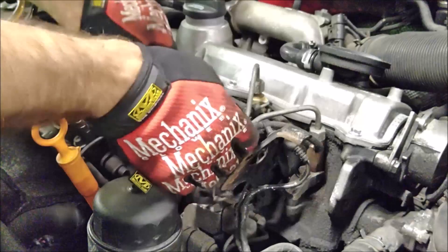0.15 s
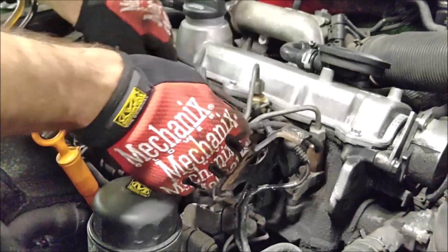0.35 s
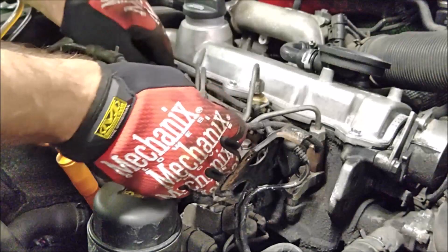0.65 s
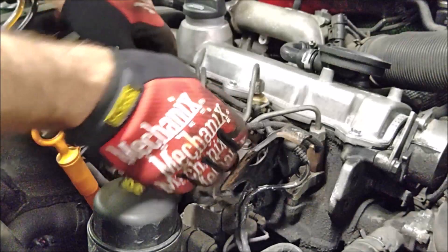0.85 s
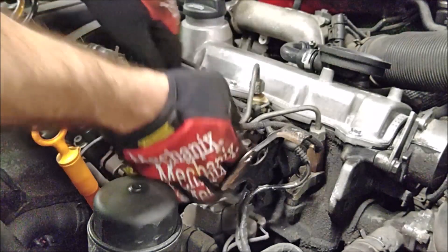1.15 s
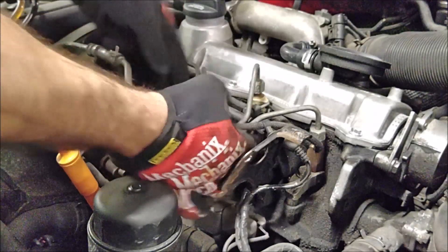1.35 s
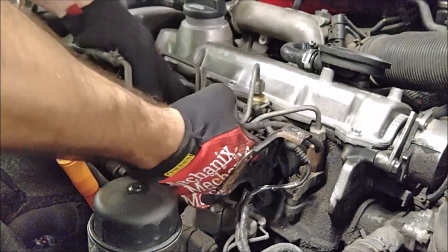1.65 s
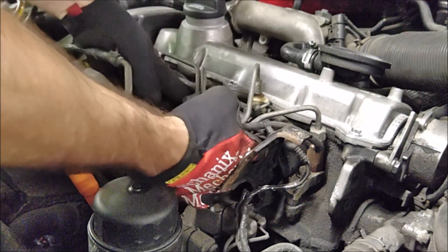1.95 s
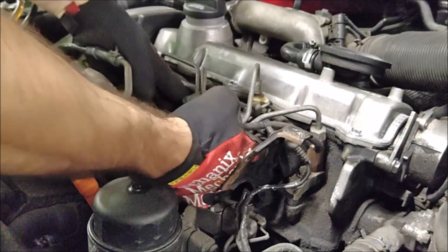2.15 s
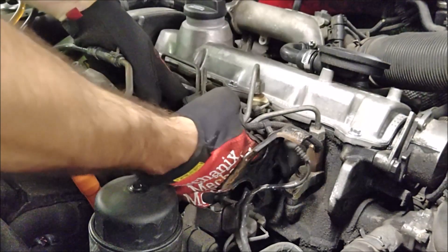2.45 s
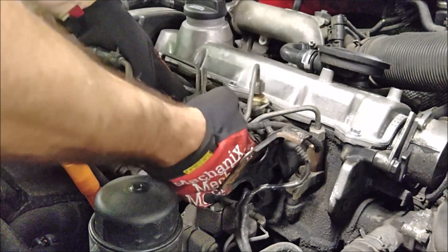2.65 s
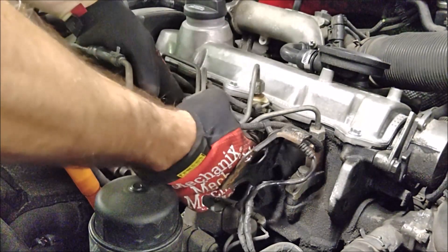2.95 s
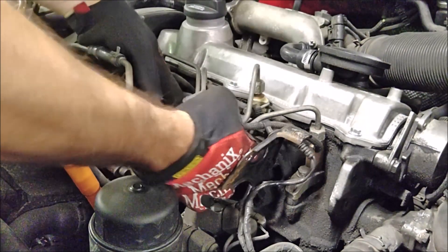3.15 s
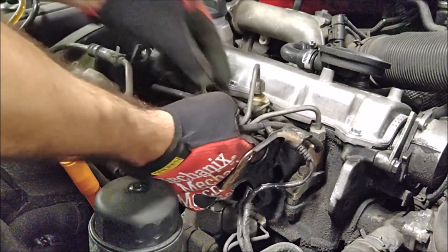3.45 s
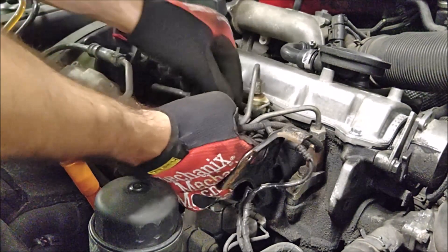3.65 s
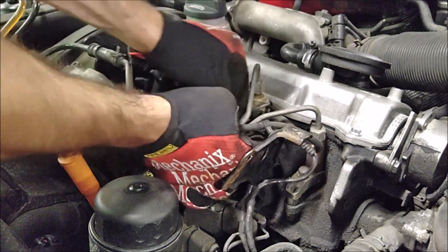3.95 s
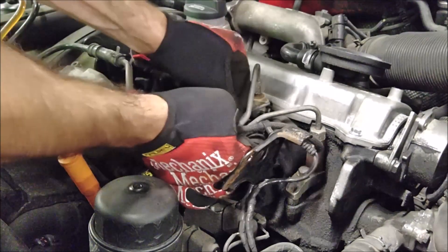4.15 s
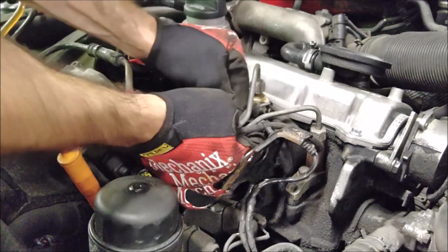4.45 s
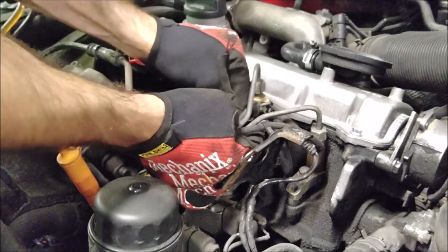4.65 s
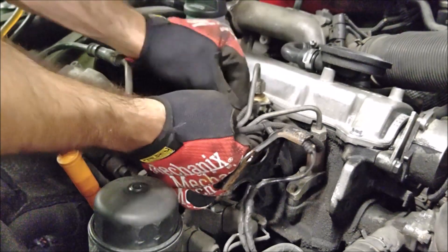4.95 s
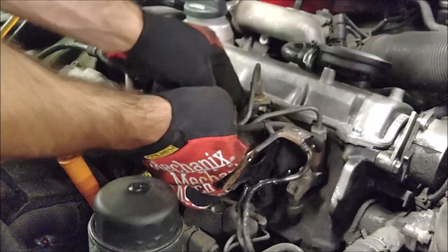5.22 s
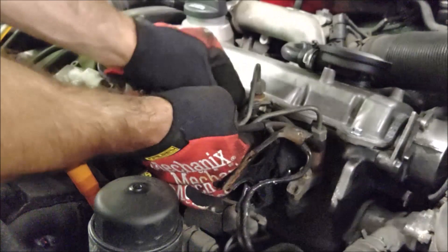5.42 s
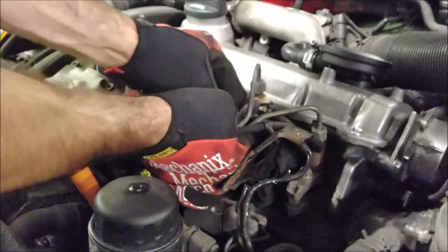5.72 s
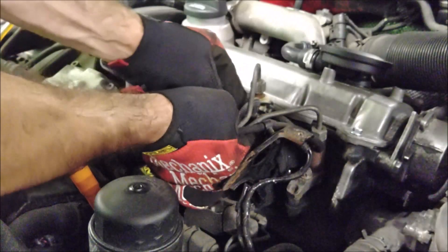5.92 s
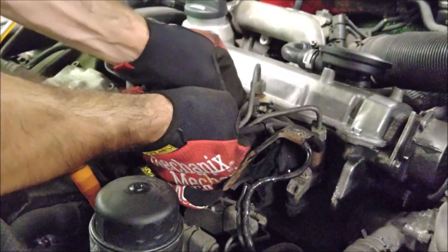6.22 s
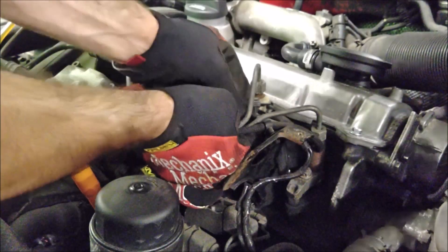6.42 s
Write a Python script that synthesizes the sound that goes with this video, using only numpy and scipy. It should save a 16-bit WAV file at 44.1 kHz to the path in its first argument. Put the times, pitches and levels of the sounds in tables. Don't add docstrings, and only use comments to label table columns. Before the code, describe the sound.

Gloved fingers work a plastic clip and wires loose. Soft scratchy rustling opens, a stronger rub and tick follow, then sparse clicks and a harder double click. The clip pops free, loudest of all, with a very short bright tail. Clustered clicks, a soft thud and scattered brushes end it. Close simple microphone, slightly grainy detail, quiet workshop hum behind.

```python
import sys
import numpy as np
from scipy import signal
from scipy.fft import rfft, irfft, next_fast_len
from scipy.io import wavfile
from scipy.ndimage import uniform_filter1d

SR = 44100
rng = np.random.default_rng(int(sys.argv[2]) if len(sys.argv) > 2 else 0)


def log_audio(samples):
    frames = np.atleast_2d(samples).T
    limited = np.clip(frames, -1, 1)
    pcm = np.round(limited * 32767).astype(np.int16)
    wavfile.write(sys.argv[1], SR, pcm)


def invert_db(x):
    u = np.asarray(x, float) / 20
    return 10 ** u


N = 290178
STEP = 32


def rms_one(x):
    return x / np.sqrt(np.mean(x ** 2) + 1e-20)


def colour(x, spectrum):
    hz, db = np.transpose(spectrum)
    size = next_fast_len(N)
    grid = np.maximum(np.arange(size // 2 + 1) * SR / size, 1)
    gain = invert_db(np.interp(np.log(grid), np.log(hz), db, left=-80, right=-80))
    return rms_one(irfft(rfft(x, size) * gain, size)[:N])


def drift(rate_hz):
    r = np.exp(-2 * np.pi * rate_hz / SR)
    noise = rng.standard_normal(N + SR)
    return rms_one(signal.lfilter([1], [1, -2 * r, r * r], noise)[SR:])


def resonance(x, hz, width_hz):
    r = np.exp(-np.pi * width_hz / SR)
    poles = [1, -2 * r * np.cos(2 * np.pi * hz / SR), r * r]
    return signal.lfilter([(1 - r * r) / 2, 0, (r * r - 1) / 2], poles, x)


def add(out, s, sound, peak_db):
    i = int(s * SR)
    sound = sound[:N - i]
    out[i:i + len(sound)] += invert_db(peak_db) * sound / np.abs(sound).max()


def dying(t60, rise_s):
    t = np.arange(8192) / SR
    envelope = (1 - np.exp(-t / rise_s)) * invert_db(-60 * t / max(t60, .003))
    return rng.standard_normal(len(t)) * envelope


def stroke(s, peak_db, swell_s, fade_s):
    late = np.arange(0, N, STEP) / SR - s
    fall = np.maximum(-late / max(swell_s, .003), late / max(fade_s, .003))
    return invert_db(2 * peak_db - 20 * fall)


def fibres(per_s, spread_db, hiss):
    sizes = invert_db(spread_db * np.minimum(rng.exponential(1, N), 5)) * rng.choice([-1, 1], N)
    chance = per_s * invert_db(2.5 * drift(40)) / SR
    slips = sizes * (rng.random(N) < chance)
    rub = rms_one(slips) + hiss * rng.standard_normal(N)
    return rub * invert_db(.8 * drift(25))


# (frequency [Hz], level [dB per Hz])
WEAVE_COLOUR = [(3240, -40), (5500, -22.5), (7320, -3), (8680, 2.5), (11400, -13), (13800, -15.5),
                (15200, -14.5), (16000, -21)]
# (frequency [Hz], level [dB per Hz])
PALM_COLOUR = [(2400, -19.5), (3200, -4), (4500, -1.5), (5800, -0.5), (7000, -3.5)]
# (frequency [Hz], level [dB per Hz])
RUBBER_COLOUR = [(800, -6), (1200, -0.5), (1900, 4), (2700, 2.5), (3400, -10)]
# (time [s], rustle level [dB], palm level above rustle [dB])
RESTING = [(0.0, -51, -12), (0.37, -68, -8), (0.82, -56, -8), (0.95, -46, -12), (1.05, -45, -8),
           (1.3, -45.5, -12), (1.47, -60, -6), (1.77, -51, -8), (1.83, -62, -6), (2.15, -51, -7),
           (2.23, -63, -7), (2.72, -57, -5), (3.14, -63, -6), (3.58, -64, -4), (4.0, -56, -5),
           (4.13, -66, -4), (5.3, -66, -3), (6.58, -62, -3)]
# (loudest time [s], level [dB], swell [s per 10 dB], fade [s per 10 dB],
# palm level above rustle [dB])
GLOVE_SLIDES = [(.121, -47, .07, .09, -5), (.302, -48, .07, .035, -11), (.476, -47.5, .075, .09, -6.5),
                (.641, -45.5, .05, .07, -9.5), (.732, -47, .05, .11, -9), (6.364, -51.5, .085, .04, -6),
                (1.385, -38, .07, .05, -1.5), (1.441, -41.5, .06, .024, -5),
                (1.588, -40.5, .065, .075, -12.5), (2.011, -56, .15, .1, -8), (2.575, -46, .05, .11, -7),
                (2.854, -41.5, .065, .012, -8.5), (3.241, -39, .04, .04, -10),
                (3.287, -40, .06, .016, -7.5), (3.39, -49.5, .06, .15, -10), (3.504, -50.5, .15, .06, -10),
                (4.252, -56, .12, .08, -9), (5.59, -52, .03, .13, -6), (4.807, -49.5, .16, .1, -6),
                (4.985, -39, .03, .055, -8), (5.2, -50, .1, .09, -6), (5.542, -37.5, .022, .012, -7),
                (5.97, -56, .12, .15, -6.5), (6.455, -43, .05, .036, -8)]
# (loudest time [s], level [dB], fade [s per 10 dB], palm level above rustle [dB])
FINGER_BRUSHES = [(.22, -46, .025, -16), (.875, -45, .03, -16), (.975, -31.5, .022, -13),
                  (1.517, -50, .02, -6), (1.826, -50, .015, -5), (2.279, -50, .04, -4),
                  (2.359, -43, .01, -5.5), (2.428, -54, .08, -6), (2.92, -55, .03, -3),
                  (2.991, -42, .013, -8), (3.07, -56, .04, -6), (3.195, -47, .03, -5.5),
                  (3.655, -53.5, .15, -3.5), (3.817, -44.5, .02, -14), (3.879, -44, .022, -10),
                  (3.957, -46, .03, -7), (4.46, -59, .03, -6), (5.09, -43, .012, -18),
                  (5.134, -45, .02, -1.5), (5.398, -57, .06, -4), (5.505, -52, .02, -6),
                  (5.869, -57, .015, -18), (6.046, -42.5, .02, -12), (6.196, -57.5, .03, -7)]
# (loudest time [s], level [dB], swell and fade [s per 10 dB])
HOSE_DRAGS = [(.115, -50, .04), (.29, -55, .04), (.476, -56, .08), (1.04, -55.5, .1), (3.25, -55, .04),
              (5.07, -54, .05), (1.38, -57, .06), (.68, -58, .1), (2.04, -60, .06), (5.134, -55, .02),
              (6.1, -63, .08), (3.7, -63, .1)]


def glove():
    brush_swell_s = .019
    rubber_db, rubber_follows = -64.5, .6
    at = np.arange(0, N, STEP)
    s, rest_db, palm_db = np.transpose(RESTING)
    weave = invert_db(2 * np.interp(at / SR, s, rest_db))
    palm = invert_db(2 * np.interp(at / SR, s, rest_db + palm_db))
    brushes = [(s, db, brush_swell_s, fade_s, p) for s, db, fade_s, p in FINGER_BRUSHES]
    for s, db, swell_s, fade_s, palm_db in GLOVE_SLIDES + brushes:
        power = stroke(s, db, swell_s, fade_s)
        weave = weave + power
        palm = palm + power * invert_db(2 * palm_db)
    rubber = invert_db(2 * rubber_db) * (weave * 10 ** 5) ** rubber_follows
    rubber = rubber + sum(stroke(s, db, slope_s, slope_s) for s, db, slope_s in HOSE_DRAGS)
    rub = fibres(6000.0, spread_db=2.4, hiss=1.3)
    out = np.zeros(N)
    for power, spectrum in (weave, WEAVE_COLOUR), (palm, PALM_COLOUR), (rubber, RUBBER_COLOUR):
        out = out + np.interp(np.arange(N), at, np.sqrt(power)) * colour(rub, spectrum)
    return out


# (time [s], peak [dB], centre [Hz], low part above peak [dB])
FREE_TICKS = [(0.539, -33, 8500, -10), (1.368, -21, 8100, -23), (1.514, -34, 8900, -33),
              (1.8272, -28, 8600, -22), (1.941, -39, 7150, -18), (2.2743, -33.5, 8060, -19),
              (2.4196, -35, 8060, -23), (2.52, -41, 7630, -19), (2.5875, -29, 8800, -14),
              (2.6588, -30, 7700, -27), (2.7053, -34.5, 8350, -26), (2.9901, -29, 8150, -14),
              (3.2275, -13, 8700, -20), (3.3842, -30.5, 8450, -35), (3.6085, -33.5, 8500, -9),
              (3.733, -36, 8500, -20), (3.8103, -31, 8850, -19), (3.8164, -32, 9230, -10),
              (4.5236, -41, 8300, -27), (4.9727, -15.5, 8200, -14), (4.9795, -24.5, 7500, -30),
              (4.9935, -25, 7740, -8), (5.0362, -31, 8700, -17), (5.0627, -23, 8300, -43),
              (5.0836, -22.5, 8200, -38), (5.088, -27, 8000, -31), (5.8676, -31, 7600, -34),
              (6.1628, -34, 8600, -34)]
# (time [s], peak [dB], centre [Hz], low part above peak [dB])
HELD_TICKS = [(3.2300, -18, 8600, -25), (3.2267, -16, 6800, -19), (3.8810, -36, 8900, -14),
              (3.9435, -33.5, 7960, 0), (4.2954, -27.5, 7400, -40), (4.9355, -28, 7780, -8),
              (4.945, -33, 9400, -20), (4.9505, -21, 8000, -10), (4.96, -32, 8360, -23),
              (4.9679, -15, 8550, -25), (3.7790, -36, 8500, -20), (4.948, -19, 8000, -9),
              (5.8620, -38, 7850, -30), (5.9972, -21, 7000, -7)]


def ticks():
    free_t60_s, held_t60_s = .022, .012
    out = np.zeros(N)
    for table, t60 in (FREE_TICKS, free_t60_s), (HELD_TICKS, held_t60_s):
        for s, peak_db, hz, low_db in table:
            crackle = dying(t60, .0001)
            crackle[:2] = [5, -2.5]
            pitched = rms_one(resonance(crackle, hz, 1800.0))
            edge = invert_db(-19.0) * rms_one(np.diff(crackle, prepend=0))
            body = rms_one(resonance(resonance(crackle, 4700, 2600.0), 4700, 2600.0))
            add(out, s, pitched + edge + invert_db(low_db) * body, peak_db)
    return out


# (time [s], peak [dB])
RELEASE = [
    (4.3157, -8.3),
]
# (frequency [Hz], level [dB], t60 [s])
FASTENER_MODES = [(3900, -26, .01), (4800, -20, .01), (5370, -9, .011), (5730, -2, .013), (6100, -4, .012),
                  (6650, -2, .012), (7290, 0, .015), (8600, -9, .011), (8920, -7, .012), (10000, -17, .009)]


def snap():
    out, t = np.zeros(N), np.arange(8192) / SR
    (s, peak_db), = RELEASE
    ring = sum(invert_db(db - 60 * t / t60) * np.sin(2 * np.pi * hz * t) for hz, db, t60 in FASTENER_MODES)
    ring = ring * (1 - np.exp(-t / 0.00036))
    ring = signal.sosfilt(signal.butter(4, [3800, 11000], "band", fs=SR, output="sos"), ring)
    for bounce_s, level_db in (0, 0), (.0013, -6), (.0031, -14):
        add(out, s + bounce_s, ring, peak_db + level_db)
    add(out, s, np.diff(dying(0.0096, .00005), 2), peak_db - 21.0)
    for t60, level_db in (.045, -20), (.45, -29):
        tail = resonance(resonance(dying(t60, 0.0016), 6700, 3000.0), 5700, 4000.0)
        add(out, s, tail, peak_db + level_db)
    return out


# (time [s], peak [dB], centre [Hz], t60 [s])
HOUSING_KNOCKS = [(1.513, -42.5, 2380, 0.046), (1.818, -34, 2700, 0.03), (1.828, -40, 2800, .025),
                  (2.985, -46, 2590, 0.05), (3.2385, -39, 1100, 0.02), (3.783, -59, 600, 0.041),
                  (4.198, -49, 1100, 0.25), (5.024, -44, 1290, 0.03), (5.538, -47, 2800, 0.046),
                  (6.038, -43, 600, 0.082), (6.069, -36, 1850, 0.064),
                  (5.025, -43.5, 190, 0.094), (4.66, -52, 980, 0.9), (5.026, -41, 360, 0.07),
                 (5.04, -49, 800, .4), (5.06, -51, 280, .35), (4.99, -46, 450, .1), (.52, -55, 170, .6),
                 (1.78, -53, 150, .4), (2.8, -55, 120, .7), (.31, -54, 170, 0.4), (6.074, -46, 700, 0.08),
                 (6.044, -47, 1000, .06), (6.09, -56, 2050, 0.09)]
# (time [s], peak [dB], frequency [Hz], t60 [s])
BODY_THUMPS = [
    (.265, -53, 750, .25),
    (2.97, -52, 2400, .15),
    (0.296, -49, 106.5, 0.18),
    (0.501, -47.5, 114, 0.22),
    (1.808, -53, 160, 0.12),
    (2.967, -54, 113, 0.15),
    (5.023, -48.5, 107, 0.11),
]


def knocks():
    out, t = np.zeros(N), np.arange(8192) / SR
    for s, peak_db, hz, t60 in HOUSING_KNOCKS:
        blow = dying(t60, 0.00042)
        add(out, s, resonance(resonance(blow, hz, 0.57 * hz), hz, 1.3 * hz), peak_db)
    for s, peak_db, hz, t60 in BODY_THUMPS:
        swing = np.sin(2 * np.pi * hz * t) * (1 - np.exp(-t / 0.0031))
        add(out, s, swing * invert_db(-60 * t / t60), peak_db)
    return out


# (frequency [Hz], level [dB per Hz])
ROOM_FLOOR = [(8.8, -33), (15, -0.5), (59, -3.5), (94, -12), (130, -16), (312, -21.5), (350, -23.5),
              (559, -10), (816, -28), (1340, -28.5), (2020, -29.5), (4430, -42.5), (8930, -24.5),
              (11000, -34), (16000, -31.5)]
# (frequency [Hz], width [Hz], level [dB])
DUCT = [(525.6, 110, -69.5), (699, 200, -70.5)]


def workshop():
    out = invert_db(-56.0) * colour(rng.standard_normal(N), ROOM_FLOOR)
    for hz, width_hz, db in DUCT:
        band = resonance(resonance(rng.standard_normal(N), hz, width_hz), hz, width_hz)
        breath = invert_db(db + 1.0 * drift(1.1))
        out = out + breath * rms_one(band)
    return out


def scene():
    mono = glove() + ticks() + snap() + knocks() + workshop()
    return np.stack([mono, mono])


# (time [s], rounding step above frame rms [dB])
COARSE_MOMENTS = [(.207, 10), (.250, 13), (.271, 15), (.292, 13), (.356, 10), (.868, 14), (.890, 13),
                  (1.636, 17), (1.658, 15), (1.892, 11), (2.170, 11), (2.319, 10), (2.468, 11), (2.618, 10),
                  (2.916, 12), (2.980, 10), (3.279, 12), (3.343, 11), (3.556, 12), (3.834, 19), (5.519, 10),
                  (5.604, 14), (5.626, 12)]


def recorder_rounding(x):
    frame, frame_start, band = 941, 629, 16
    usual_db, attack_db = -9, -24
    follow, scatter_db, treble_db = .5, 4, 10.5
    keep_hz, top_hz = 190, 15750
    n, k = np.arange(2 * frame) + .5, np.arange(frame) + .5
    window = np.sin(np.pi * n / (2 * frame)) * np.sqrt(2 / frame)
    basis = np.cos(np.pi / frame * np.outer(k, n + frame / 2)) * window
    padded = np.pad(x, (2 * frame - frame_start, 2 * frame))
    index = frame * np.arange(len(padded) // frame - 1)[:, None] + np.arange(2 * frame)
    lines = padded[index] @ basis.T

    step_db = np.full(len(lines), usual_db)
    attack = np.abs(padded[index]).max(axis=1) > 7 * padded[index].std(axis=1)
    step_db[attack] = attack_db
    for s, db in COARSE_MOMENTS:
        step_db[round((s * SR - frame_start) / frame) + 1] = db

    scatter = rng.standard_normal((len(lines), frame // band + 1))
    scatter = np.repeat(scatter, band, axis=1)[:, :frame]
    scatter = (scatter + np.roll(scatter, 1, axis=0) + np.roll(scatter, 2, axis=0)) / np.sqrt(3)

    local = np.sqrt(uniform_filter1d(lines ** 2, size=60, axis=1) + 1e-20)
    whole = np.sqrt(np.mean(lines ** 2, axis=1, keepdims=True) + 1e-20)
    hz = k * SR / (2 * frame)
    treble = treble_db * np.clip(hz / 3000 - 3.3, 0, 1)
    step = invert_db(step_db[:, None] + scatter_db * scatter + treble)
    step = step * local ** follow * whole ** (1 - follow)
    step = step * np.clip(hz / keep_hz, .05, 1) ** 3 * np.clip(hz / 1500, .55, 1)

    coarse = step * np.sign(lines) * np.floor(np.abs(lines) / step + .4054)
    coarse = coarse * (hz < top_hz + 700 * attack[:, None])
    out = np.zeros(len(padded))
    np.add.at(out, index, coarse @ basis)
    return out[2 * frame - frame_start:][:N]


def band_limit(x):
    return signal.sosfilt(signal.butter(12, 16820, fs=SR, output="sos"), x)


def record(dry):
    mono = recorder_rounding(dry[0]) - .0005
    return band_limit(np.stack([mono, mono]))


dry = scene()
out = record(dry)
log_audio(out)
```